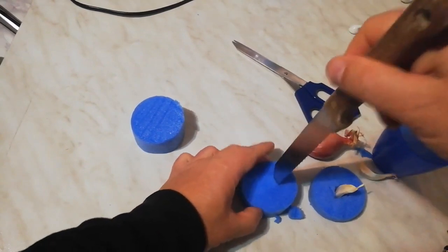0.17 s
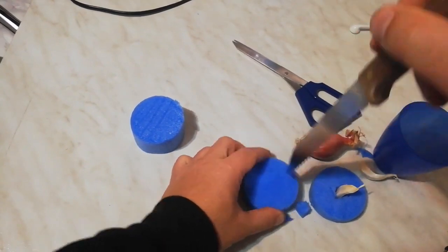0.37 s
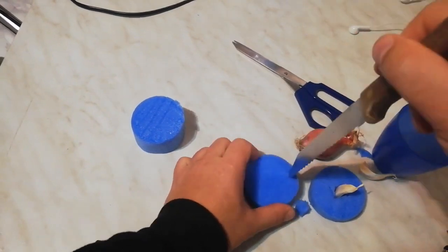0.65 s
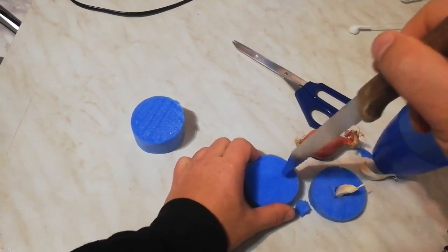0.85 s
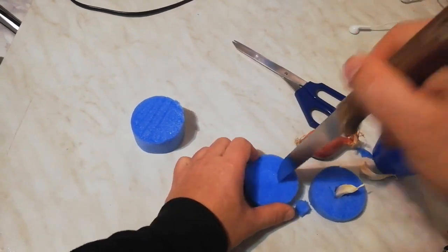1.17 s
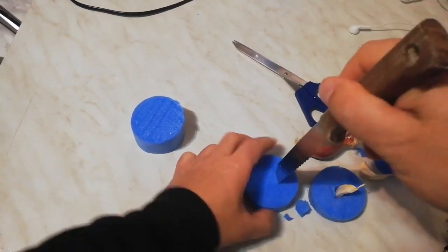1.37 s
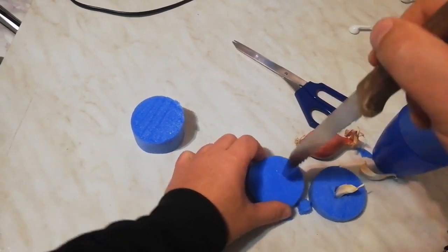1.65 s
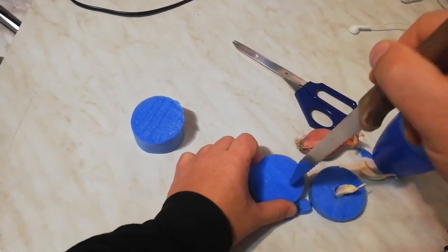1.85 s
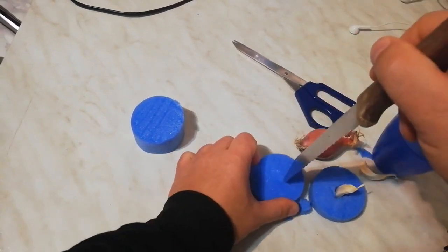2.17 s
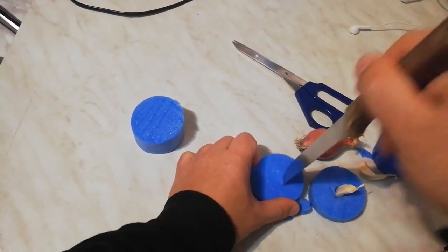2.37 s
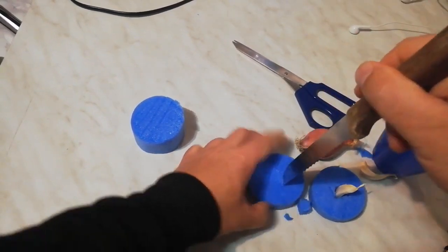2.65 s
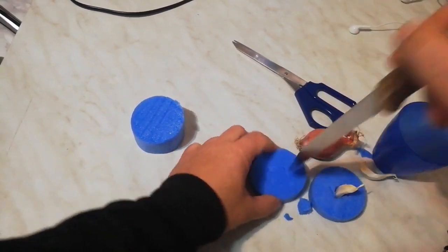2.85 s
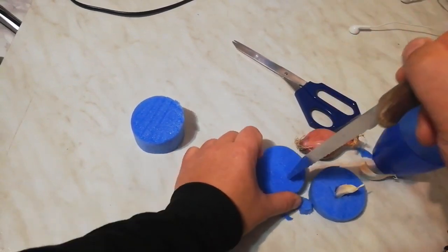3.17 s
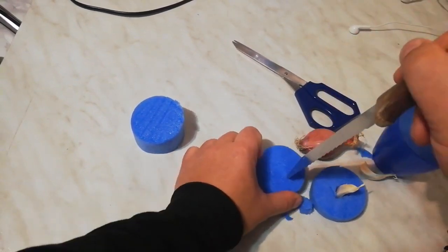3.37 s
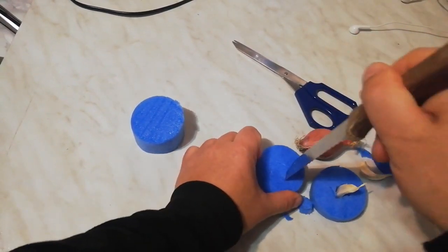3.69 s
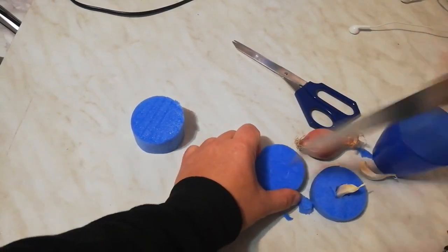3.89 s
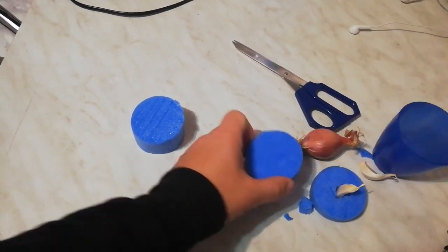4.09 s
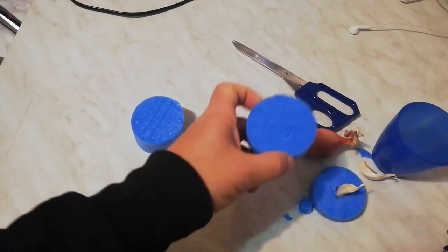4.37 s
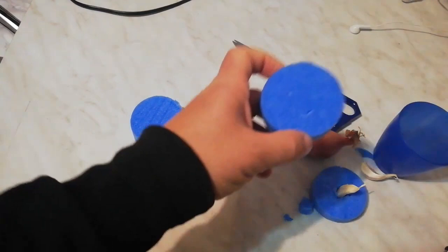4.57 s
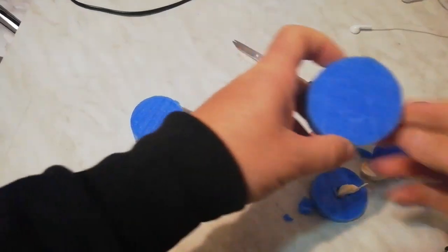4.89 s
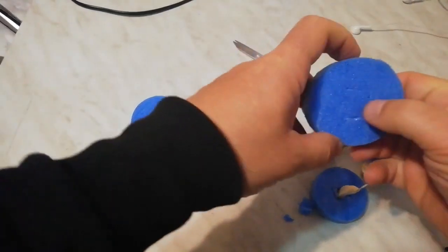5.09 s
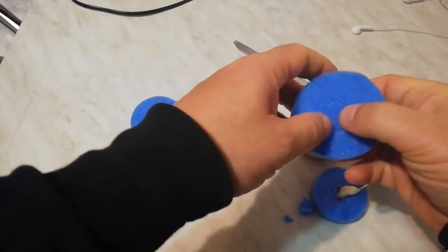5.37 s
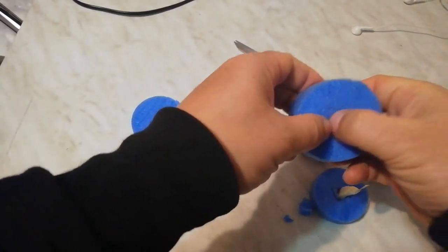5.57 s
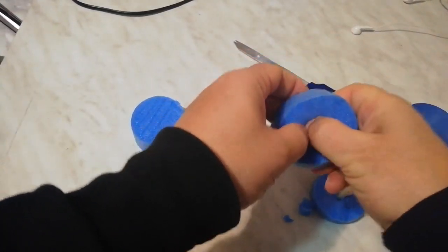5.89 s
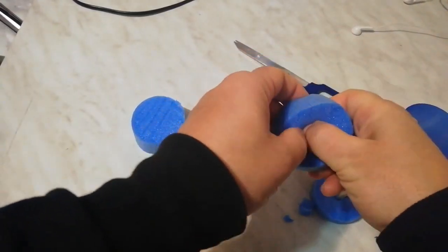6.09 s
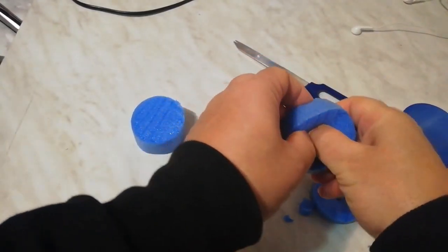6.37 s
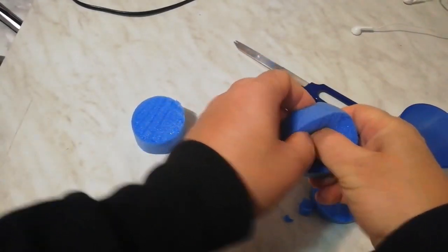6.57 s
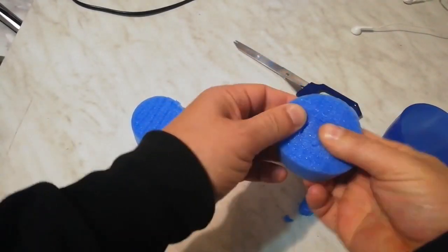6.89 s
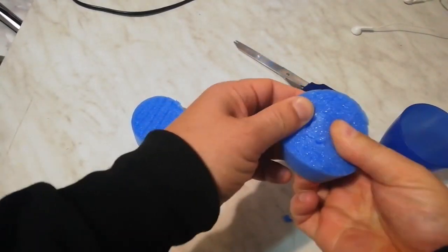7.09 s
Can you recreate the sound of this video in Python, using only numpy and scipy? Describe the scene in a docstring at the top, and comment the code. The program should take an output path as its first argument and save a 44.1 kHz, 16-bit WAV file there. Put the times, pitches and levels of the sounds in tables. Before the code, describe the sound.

A kitchen knife sinks into foam with a soft crackle, its tip knocking on the table about once a second, with scrapes and tiny snaps between cuts. After the last pull out, the steel blade and wooden handle clatter onto the table at the right. Quiet finger rubs and crackles on the foam follow. The microphone is close, in a small room with faint hiss.

```python
"""At a table in a small room, a kitchen knife is pushed through a foam disc, close by.
Each cut runs alike: the foam crackles as the blade sinks in, the tip knocks on the table and makes
it ring, then the blade rasps in the slit and scrapes back out. Afterwards the knife is laid down
to the right with a clatter, and fingers rub and bend the foam over a faint rumble and hiss."""
import sys
import numpy as np
from scipy import signal
from scipy.fft import rfft, irfft, next_fast_len
from scipy.io import wavfile

SR = 44100
rng = np.random.default_rng(int(sys.argv[2]) if len(sys.argv) > 2 else 0)


def inscribe(sig):
    """Save sig as 16-bit PCM at rate SR to the path in sys.argv[1].

    A 1-D sig is mono; a 2-D sig holds one channel per row.
    Samples are clipped to [-1, 1] before scaling.
    """
    pcm = np.round(np.clip(np.atleast_2d(sig).T, -1, 1) * 32767)
    wavfile.write(sys.argv[1], SR, pcm.astype(np.int16))


N = 319284
T = np.arange(N) / SR
SIDES = np.array([[1], [-1]])  # plus on the left, minus on the right

# The tip hits the table and rebounds. Each row: start in seconds, level in dB, bass change in dB.
TIP_KNOCKS = [(-.13, 1, -2.5), (1.2384, 0, -1.5), (1.338, -17, -11.5), (1.858, -43.5, -14),
              (2.4493, 0.44, -1.5), (2.552, -18.5, -24), (3.634, -7.5, 3)]
# The table's tones. Each row: pitch in Hz, level in dB, seconds to fade by 60 dB, stereo spread in dB.
TABLE_TONES = [(83, -26, .09, -18.5), (128, -24.5, 0.45, -29), (208, -19.5, 0.097, -15.5),
               (302.5, -16, 0.071, -19), (420, -12, 0.051, -28.5), (437, -23.5, 0.24, -13.5),
               (504, -9, 0.03, 4), (560.3, -23, 0.18, -4), (832, -21.5, 0.12, -4), (936, -11, 0.078, -4),
               (1205, -23.5, 0.13, -3), (1417, -26, 0.11, -4.5), (1590, -15, 0.021, -4),
               (2295, -18, 0.026, -6.5)]
# The tone colours of the table's dense, noisy ring and of the cut. Each row: frequency in Hz, level in dB.
DENSE_RING_COLOUR = [(120, -12), (450, 1), (700, -7.5), (1000, -4), (1530, -6.5), (1850, -18),
                     (4000, -45.5)]
CUT_COLOUR = [(130, 1), (680, -11.5), (950, -10), (2300, -3.5), (4300, -7), (7500, -10.5), (10000, -4.5),
              (16000, -35)]
def knocks():
    """The tip ticks on the table, which rings with a few clear tones and many more blurred into noise."""
    t, ring = T[:SR], 0
    for k, (hz, db, fade_s, spread_db) in enumerate(TABLE_TONES):
        phase = 2 * np.pi * hz * t
        wave = np.sin(phase) + undb(spread_db) * np.cos(phase) * (-1) ** (k // 2) * SIDES
        # neighbouring tones swing against each other
        ring = ring + (-1) ** k * undb(db) * wave * np.exp(-np.log(1000) * t / fade_s)
    ring = room(ring * np.minimum(t / 0.0019, 1), wet_db=-11.5, early_db=-23)
    blows, ticks = np.zeros((2, 2, N))
    for s, db, bass_db in TIP_KNOCKS:
        dense_ring = unit(colour(stereo_noise(SR, 0.3), DENSE_RING_COLOUR))
        dense_ring = dense_ring * np.exp(-t / 0.1) * np.minimum(t / 0.0032, 1)
        add(blows, s, undb(db) * colour(ring + undb(-27) * dense_ring, [(550, bass_db), (880, 0)]))
        add(ticks, s, undb(-22 + 0.85 * db) * burst(CUT_COLOUR, decay_s=0.0059, alike=0.85))
    return blows + room(ticks, wet_db=-8, early_db=-15)


def pushes(cuts, lead_s=0.0013):
    """The blade sinks through the foam ever faster, up to the knock that ends each cut."""
    speed = sum(stroke(s - lead_s, rise_s=0.076, fall_s=0.022) for s in cuts)
    return undb(-33) * speed * friction(CUT_COLOUR, per_s=670, spread_db=1, grain_db=2.5, alike=0.31)


# The blade's last pull out of the disc. Each row: peak time in seconds, level in dB, length in seconds.
PULL_OUT = [(3.98, -49.5, 0.51)]
# The tone colour of the disc's body. Each row: frequency in Hz, level in dB.
DISC_COLOUR = [(800, -15), (1500, 1.5), (2300, -1), (3600, 1), (6500, -19.5)]
def rasp(cuts, blade, fingers, lag_s=0.14):
    """The disc rasps as the blade works sideways in the slit or pulls out, and under scrapes and rubs."""
    twist = undb(-52) * sum(stroke(s + lag_s, rise_s=0.25, fall_s=0.47) for s in cuts if s > 0)
    sliding_power = (undb(-13.5) * blade) ** 2 + (undb(-10.5) * fingers) ** 2
    level = np.sqrt(twist ** 2 + strokes(PULL_OUT) ** 2 + sliding_power)
    return level * friction(DISC_COLOUR, per_s=400, spread_db=3, grain_db=1, alike=0.34)


# The bright tone colour of snapping foam and struck steel. Each row: frequency in Hz, level in dB.
BRIGHT_COLOUR = [(2500, -25.5), (4500, -8.5), (7300, -8), (9400, -2.5), (12000, -5), (16000, -23.5)]
# Larger foam cells break. Each row: start in seconds, level of the snap in dB, level of the body in dB.
CELL_SNAPS = [(0.2438, -40, -46), (0.8131, -51.5, -48.5), (1.106, -47.5, -54.5), (1.1738, -31, -47.5),
              (2.186, -59, -54), (2.3235, -49, -48.5), (2.4057, -26, -48), (2.5757, -31.5, -51),
              (2.843, -30.5, -31), (3.533, -37, -52), (3.559, -37, -61), (3.8737, -34, -33.5),
              (4.1684, -51, -64), (5.1737, -39, -43.5), (6.7155, -28.5, -37.5), (6.755, -31.5, -44),
              (6.85, -41, -57), (6.984, -41, -45), (7.009, -42, -59), (7.076, -47.5, -55),
              (7.208, -49.5, -70)]
def snaps():
    """Single cell walls break with a bright snap, and the body of the disc answers."""
    out = np.zeros((2, N))
    for s, snap_db, body_db in CELL_SNAPS:
        add(out, s, undb(snap_db) * burst(BRIGHT_COLOUR, decay_s=0.0015, alike=0.18))
        add(out, s, undb(body_db) * burst(DISC_COLOUR, decay_s=0.0041, alike=0.94))
    return out


def crackle(cuts, sliding, per_s=68, spread_db=5, lead_s=0.027):
    """Small cell walls give way at random as the tip works in and as steel or skin slides along."""
    prick = undb(-46.5) * sum(stroke(s - lead_s, rise_s=0.077, fall_s=0.046) for s in cuts)
    level = prick + undb(-5) * sliding
    kicks = random_kicks(per_s, spread_db, limit=3)
    snap = burst(BRIGHT_COLOUR, decay_s=0.001, alike=0.17, attack_s=0.00023)
    snap += undb(-12) * burst(DISC_COLOUR, decay_s=0.0016, alike=1)
    return level * unit(signal.fftconvolve(kicks[None], snap, axes=1)[:, :N])


# Blade and fingers slide on the foam. Each row: peak time in seconds, level in dB, length in seconds.
BLADE_SCRAPES = [(.047, -41.5, 0.048), (.27, -48, 0.16), (.37, -41, 0.11), (.48, -46.5, 0.4),
                 (1.355, -44, 0.092), (1.618, -43.5, 0.41), (2.595, -46.5, 0.076), (2.715, -46, 0.18),
                 (2.91, -47, 0.56), (3.89, -43.5, 0.1), (3.97, -51.5, 0.56)]
FINGER_RUBS = [(4.31, -50, 0.15), (4.965, -34, 0.074), (5.08, -48, 0.11), (5.235, -44.5, 0.12),
               (5.282, -36.5, 0.075), (5.428, -40.5, 0.073), (5.6, -59.5, 0.49), (6.68, -50, 0.075),
               (6.735, -45.5, 0.13), (6.8, -49.5, 0.24), (6.9, -53.5, 0.42), (6.985, -50, 0.14),
               (7.08, -58.5, 0.17)]
# The tone colour of their hiss. Each row: frequency in Hz, level in dB.
SLIDING_COLOUR = [(300, -14), (750, -23.5), (1300, -7), (2400, -13.5), (3400, -5), (6900, -8.5),
                  (10200, -1), (12200, -11), (16000, -25)]
def foam(full_cut_db=-12):
    """Steel and skin hiss along the foam, mixed with its pushes, rasp, crackle and snaps."""
    cuts = [s for s, db, _ in TIP_KNOCKS if db > full_cut_db]
    blade, fingers = strokes(BLADE_SCRAPES), strokes(FINGER_RUBS)
    sliding = np.hypot(blade, fingers)
    cutting = pushes(cuts) * undb(-1.1 * SIDES)  # a little to the right
    hiss = sliding * friction(SLIDING_COLOUR, per_s=1100, spread_db=2, grain_db=-2.5, alike=0.71)
    scraping = (hiss + rasp(cuts, blade, fingers)) * undb(0.6 * SIDES)  # a little to the left
    return room(cutting + scraping + crackle(cuts, sliding) + snaps(), wet_db=-7, early_db=-4)


# The knife bounces. Each row: start in seconds, levels of blade, handle and table in dB, and the level
# change for the rebound in dB.
KNIFE_BOUNCES = [(4.372, -11, -27.5, -34.5, -0.5), (4.4053, -18, -28, -55, -17.5),
                 (4.4288, -19, -35, -39.5, -7), (4.4474, -25, -37.5, -37.5, 0),
                 (4.4592, -29, -24, -33, -10), (4.545, -16, -19, -17, 7), (4.6438, -14, -8.5, -33.5, -21),
                 (4.6903, -21, -21.5, -37.5, 4.5), (4.7732, -10.5, -16, -21, -1),
                 (4.7869, -8.5, -19, -43, -24)]
# The tone colours of the struck handle and table. Each row: frequency in Hz, level in dB.
HANDLE_COLOUR = [(800, -13), (1500, -2.5), (2300, -3), (3800, -3), (6500, -31)]
THUD_COLOUR = [(40, -14.5), (130, -2), (220, -7.5), (340, 2), (550, -6.5), (800, -8.5), (1150, -6),
               (2200, -34)]
# The blade's ring and its short, high chink. Each row: pitch in Hz, width in Hz, level in dB.
RING_TONES = [(1470, 40, -0.5), (1650, 9.2, 2), (1750, 68, -12), (9270, 45, -7)]
CHINK_TONES = [(6200, 110, -10.5), (7350, 46, 1.5), (8810, 40, -9.5), (9910, 44, 1.5)]
def knife_down(rebound_s=0.0061, slide_s=4.79, fade_db_per_s=123, lag_s=0.00056):
    """Steel blade and wooden handle bounce on the table, each contact twice, then slide to rest."""
    knife, table = np.zeros((2, 2, N))
    for first_s, blade_db, handle_db, table_db, rebound_db in KNIFE_BOUNCES:
        for s, db in (first_s, 0), (first_s + rebound_s, rebound_db):
            clink = burst(BRIGHT_COLOUR, decay_s=0.006, alike=0.13, attack_s=0.00034)
            add(knife, s, undb(blade_db + db) * clink)
            add(knife, s, undb(handle_db + db) * burst(HANDLE_COLOUR, decay_s=0.0061, alike=0.16))
            add(table, s, undb(table_db + db) * burst(THUD_COLOUR, decay_s=0.018, alike=1))
    slide = (T > slide_s) * undb(-fade_db_per_s * np.abs(T - slide_s))
    knife += slide * undb(-25.5) * unit(colour(stereo_noise(N, 0.3), BRIGHT_COLOUR))
    knife += slide * undb(-28.5) * unit(colour(stereo_noise(N, 0.52), HANDLE_COLOUR))
    table += slide * undb(-29) * unit(colour(stereo_noise(N, 0.94), THUD_COLOUR))
    ringing = undb(3) * resonate(knife, RING_TONES) + undb(-2) * resonate(knife, CHINK_TONES)
    left, right = undb(-3.5) * knife + ringing + table
    # the knife lies to the right, so its sound reaches the left later
    heard = np.array([np.interp(T - lag_s, T, left), right])
    return room(heard, wet_db=-6, early_db=-13)


# Clicks in the grip. Each row: start in seconds, level in dB.
GRIP_CLICKS = [(0.8119, -49), (1.339, -33), (1.5644, -43), (2.576, -32.5), (3.3647, -39)]
# Their tone colour. Each row: frequency in Hz, level in dB.
CLICK_COLOUR = [(300, -6.5), (1900, -5), (2900, -4.5), (3700, -16.5), (9000, -30.5)]
def clicks():
    """The knife shifts in the grip with short, dull clicks."""
    out = np.zeros((2, N))
    for s, db in GRIP_CLICKS:
        add(out, s, undb(db) * burst(CLICK_COLOUR, decay_s=0.0016, alike=1, attack_s=0.0004))
    return room(out, wet_db=-5, early_db=-2)


# The hand bumps the foam. Each row: start in seconds, level in dB.
HAND_BUMPS = [(2.258, -35.5), (3.822, -30.5), (3.866, -34), (5.043, -39), (5.551, -48.5), (6.923, -40)]
# The tone colour of a bump. Each row: frequency in Hz, level in dB.
BUMP_COLOUR = [(40, -15), (140, 2.5), (330, -1), (550, -9.5), (1500, -42)]
def bumps():
    """The hand presses the soft disc with short, dull bumps."""
    out = np.zeros((2, N))
    for s, db in HAND_BUMPS:
        add(out, s, undb(db) * burst(BUMP_COLOUR, decay_s=0.018, alike=0.94, attack_s=0.0036))
    return out


# The foam squeaks. Each row: start in seconds, length in seconds, pitch in Hz, level in dB.
FOAM_SQUEAKS = [(0.2437, 0.013, 3400, -43), (2.2, 0.047, 9340, -56), (6.844, 0.018, 2150, -45.5)]
def squeaks(width_hz=420):
    """Steel or skin sticks on the foam, which sings briefly in a narrow band of noise."""
    out = 0
    for s, length_s, hz, db in FOAM_SQUEAKS:
        swell = np.sin(np.pi * np.clip((T - s) / length_s, 0, 1)) ** 0.5
        band = signal.butter(2, [hz - width_hz / 2, hz + width_hz / 2], "band", fs=SR)
        out = out + undb(db) * swell * unit(signal.lfilter(*band, stereo_noise(N, 0.42)))
    return out


# The room's echo. Each row: frequency in Hz, seconds to fade by 60 dB.
ECHO_FADES = [(100, 1), (450, 0.76), (1100, 0.72), (3000, 0.6), (8000, 0.26), (15000, 0.18)]
def room(x, wet_db, early_db):
    """Add early echoes from the table and near walls (early_db) and a smooth fading tail (wet_db)."""
    t = T[:SR]
    hz = np.fft.rfftfreq(SR, 1 / SR)
    mid, side = rfft(rng.standard_normal((2, SR)))
    noise = mid + side * np.minimum(hz / 520, 1) * SIDES  # low sounds reach both sides alike
    centres, tail = np.array(ECHO_FADES)[:, 0], 0
    for share, (_, fade_s) in zip(np.eye(len(centres)), ECHO_FADES):
        band = irfft(noise * read_curve(hz, np.c_[centres, share]))
        tail = tail + band * np.exp(-np.log(1000) * t / fade_s)
    tail = unit(tail * np.minimum(t / 0.006, 1))
    early = unit(stereo_noise(SR, 0.038) * np.exp(-t / 0.023) * (t > 0.001))
    echo = (undb(wet_db) * tail + undb(early_db) * early) / np.sqrt(SR)
    return x + signal.fftconvolve(x, echo, axes=1)[:, :x.shape[1]]


# The tone colour of the quiet room. Each row: frequency in Hz, level in dB.
AIR_COLOUR = [(25, -12.5), (108, -14), (620, -26), (1200, -26.5), (3800, -25.5), (7000, -30), (10000, -25),
              (16000, -40)]
def air():
    """Quiet room rumble, alike on both sides, under microphone hiss."""
    mid, side = colour(rng.standard_normal((2, N)), AIR_COLOUR)
    side = signal.lfilter(*signal.butter(1, 500, "high", fs=SR), side)
    return undb(-64) * (mid + side * SIDES) / np.std(mid)


def friction(points, per_s, spread_db, grain_db, alike):
    """Countless foam cells catch and let go: a fine hiss with larger grains in it."""
    kicks = random_kicks(per_s, spread_db, limit=4)
    grains = signal.lfilter([1], [1, -np.exp(-1 / (SR * 0.00061))], kicks)
    roughness = np.sqrt(1 + (undb(grain_db) * unit(grains)) ** 2)
    return unit(colour(stereo_noise(N, alike) * roughness, points))


def random_kicks(per_s, spread_db, limit):
    """Spikes at random times, most of them small and a few large."""
    sizes = undb(spread_db * np.minimum(rng.exponential(size=N), limit))
    return sizes * (rng.random(N) < per_s / SR)


def burst(points, decay_s, alike, attack_s=0.0028):
    """A short crack of noise that builds as the contact closes; all bursts have the same energy."""
    t = T[:SR // 8]
    shape = np.exp(-t / decay_s) * (1 - np.exp(-t / attack_s))
    crack = colour(stereo_noise(len(t), alike) * shape, points)
    return crack / np.sqrt(np.sum(crack ** 2) / (SR / 200))


def stroke(s, rise_s, fall_s):
    """The speed of one stroke peaks at time s; rise and fall are the times for a 20 dB change."""
    return 10 ** -(np.abs((T - s) / np.where(T < s, rise_s, fall_s)) ** 1.3)


def strokes(rows, rise_share=0.58):
    """The level of a series of strokes, each speeding up for rise_share of its length."""
    return np.sqrt(sum((undb(db) * stroke(s, rise_share * length, (1 - rise_share) * length)) ** 2
                       for s, db, length in rows))


def stereo_noise(count, alike, shared_below_hz=230):
    """Left and right noise with shared bass; above it, alike runs from 0 (unrelated) to 1 (the same)."""
    mid, side = rng.standard_normal((2, count))
    side = signal.lfilter(*signal.butter(1, shared_below_hz, "high", fs=SR), side)
    return np.sqrt((1 + alike) / 2) * mid + np.sqrt((1 - alike) / 2) * side * SIDES


def resonate(x, tones):
    """Let x set the given tones ringing."""
    return sum(undb(db) * signal.lfilter(*signal.iirpeak(hz, hz / width, fs=SR), x)
               for hz, width, db in tones)


def colour(x, points):
    """Give x a tone colour drawn through (Hz, dB) points."""
    size = 2 * next_fast_len(x.shape[-1])
    gains = undb(read_curve(np.fft.rfftfreq(size, 1 / SR), points))
    # fold the filter so that nothing sounds before its cause
    cepstrum = irfft(np.log(gains))
    cepstrum[1:size // 2] *= 2
    cepstrum[size // 2 + 1:] = 0
    return irfft(rfft(x, size) * np.exp(rfft(cepstrum)))[..., :x.shape[-1]]


def read_curve(hz, points):
    """Read between (Hz, value) points, with octaves evenly spaced."""
    known_hz, values = np.transpose(points)
    return np.interp(np.log(np.maximum(hz, 1)), np.log(known_hz), values)


def add(out, s, sound):
    """Mix a stereo sound in at s seconds; one that starts before zero is already under way."""
    start = int(round(s * SR))
    sound = sound[:, max(-start, 0):N - start]
    out[:, max(start, 0):max(start, 0) + sound.shape[1]] += sound


def undb(db):
    """Turn decibels into a gain."""
    return 10 ** (np.asarray(db) / 20)


def unit(x):
    """Scale to an average (rms) level of 1."""
    return x / np.sqrt(np.mean(x ** 2))


def scene():
    """Knife, foam and hands at the table, over the quiet room."""
    cutting = knocks() + foam() + clicks()
    handling = room(bumps() + squeaks(), wet_db=-9.5, early_db=-21.5)
    return cutting + handling + knife_down() + air()


def record(dry, top_hz=16200):
    """The camera cuts off the highest treble."""
    return signal.sosfilt(signal.ellip(8, 0.2, 70, top_hz, fs=SR, output="sos"), dry)


dry = scene()
out = record(dry)
inscribe(out)
```